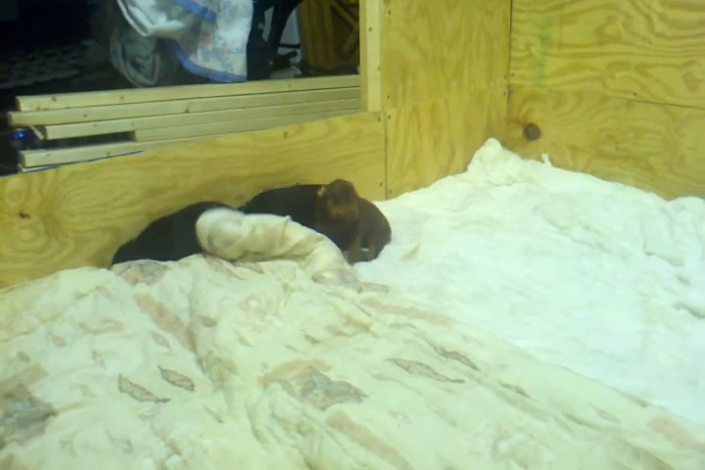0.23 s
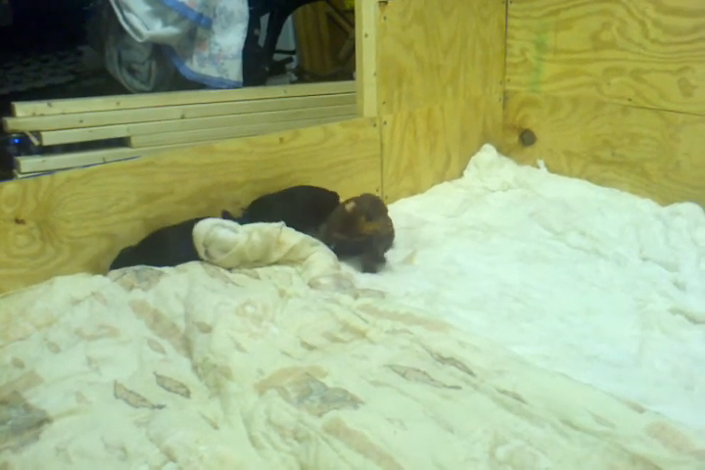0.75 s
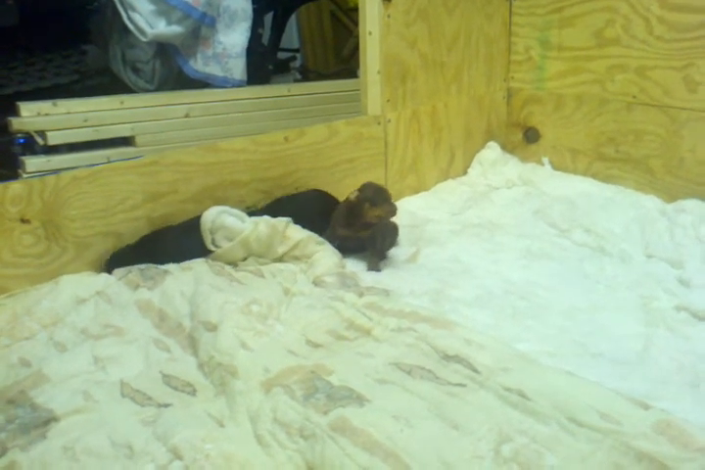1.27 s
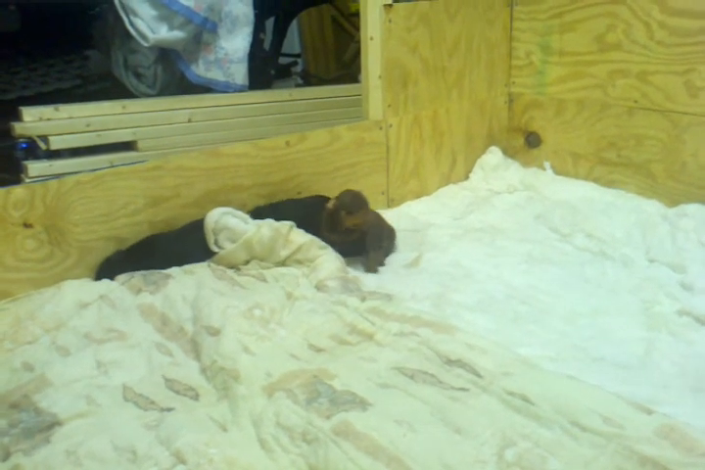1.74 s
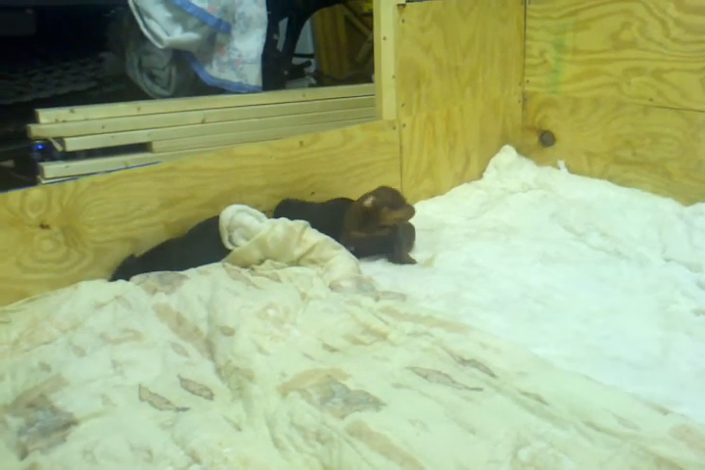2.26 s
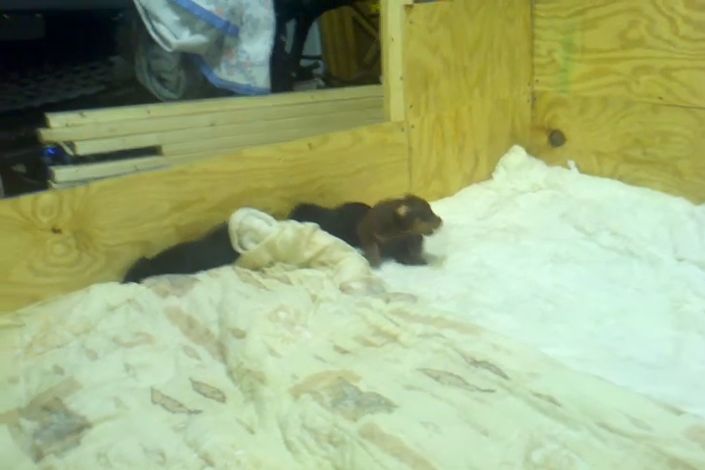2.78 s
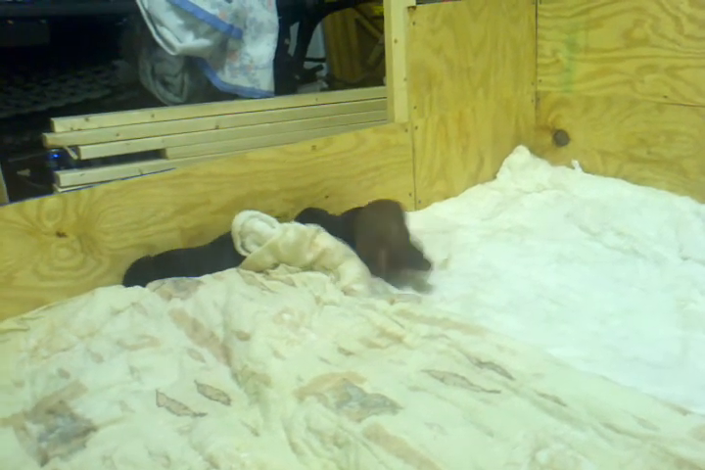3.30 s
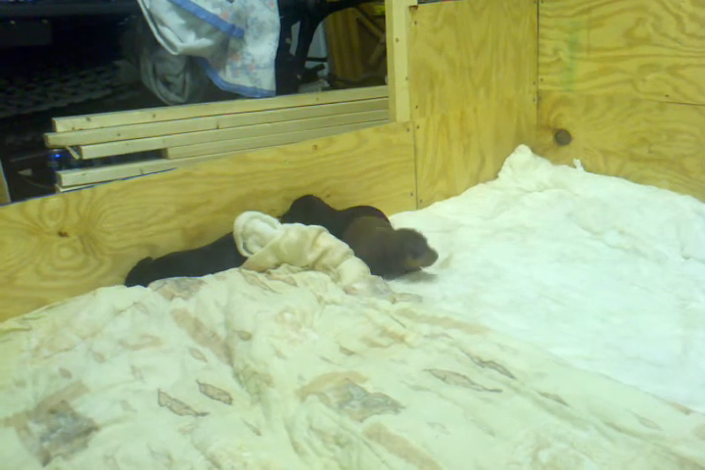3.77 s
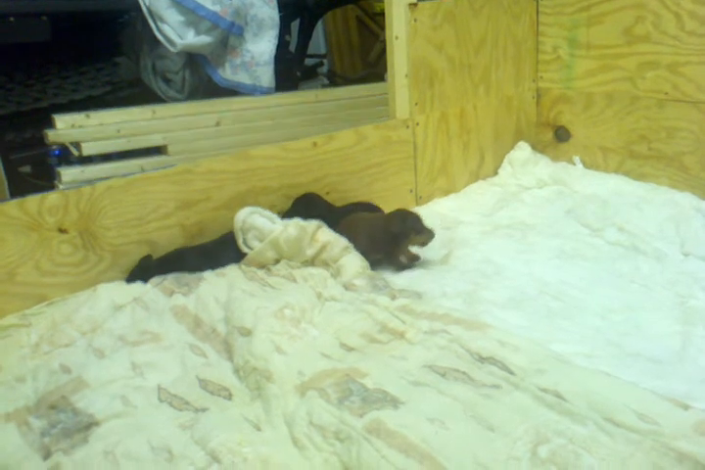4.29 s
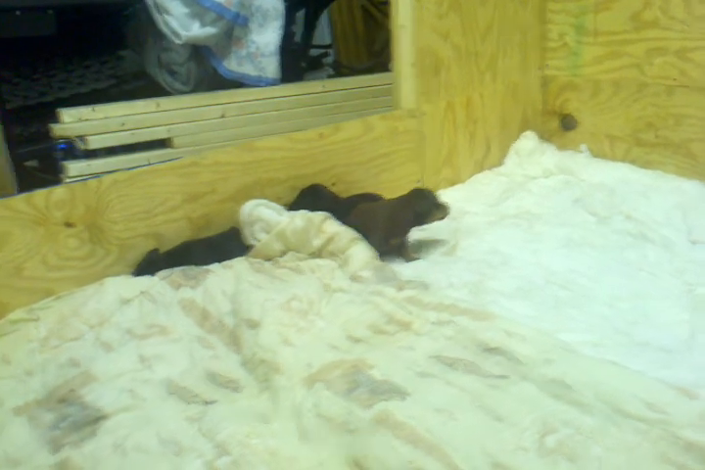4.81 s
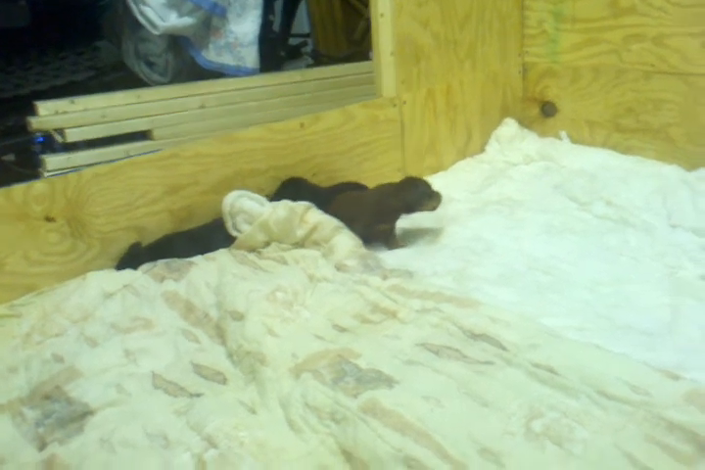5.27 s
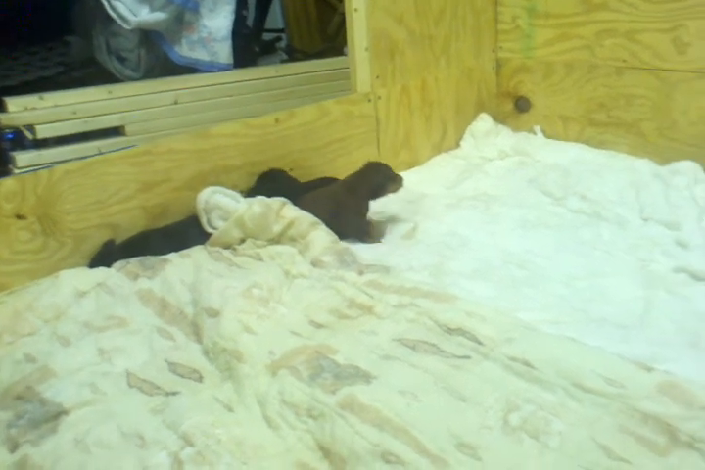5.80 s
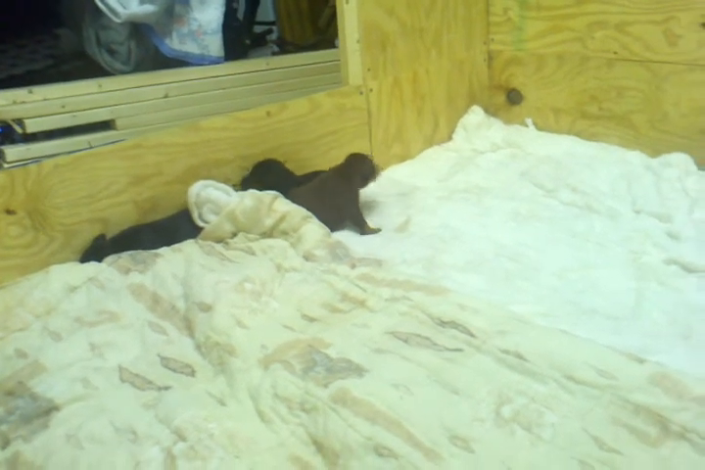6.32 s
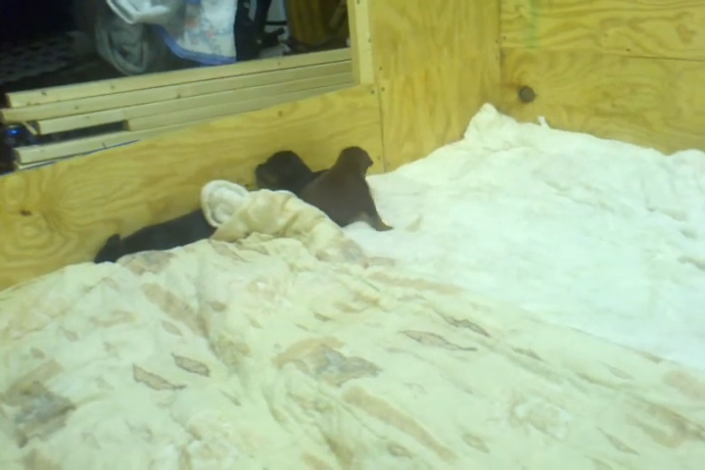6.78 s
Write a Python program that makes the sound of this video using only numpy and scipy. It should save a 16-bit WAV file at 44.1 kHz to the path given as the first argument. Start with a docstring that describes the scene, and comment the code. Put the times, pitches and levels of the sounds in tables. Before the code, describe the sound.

In a small blanket-lined wooden pen, tiny puppies give brief falling whines and broken squeaks while their bodies shuffle on fabric and thud dully against the floor. The cries start weakly, grow piercing near two seconds, then turn lower and rougher. A single loud click snaps at the right beside the microphone past four seconds, then quiet peeps and sniffing continue over low room hum, with short, dull wall reflections.

```python
"""Whimpers and squeaks of newborn puppies are heard, with snuffling and shuffling on cloth and soft bumps on the floor.
One hard snap sounds close to the right of the microphone, above faint hum and room tone. The voices are near-sines with
throat-coloured upper partials, the noises are shaped by frequency and time, and the bumps and snap are struck modes.
The blanket-lined plywood pen answers through feedback delays; two microphone ports are widened by cross-feed."""
import sys
import numpy as np
from scipy import signal
from scipy.fft import rfft, irfft, next_fast_len
from scipy.io import wavfile
from scipy.ndimage import uniform_filter1d

SR = 44100
rng = np.random.default_rng(int(sys.argv[2]) if len(sys.argv) > 2 else 0)


def inscribe(sig):
    """Save sig as 16-bit PCM at rate SR to the path in sys.argv[1].

    A 1-D sig is mono; a 2-D sig holds one channel per row.
    Samples are clipped to [-1, 1] before scaling.
    """
    pcm = np.round(np.clip(np.atleast_2d(sig).T, -1, 1) * 32767)
    wavfile.write(sys.argv[1], SR, pcm.astype(np.int16))


N = 310905
T = np.arange(N) / SR


def from_db(db):
    """Logarithmic level: 20 dB is a factor of ten in amplitude."""
    return 10 ** (np.asarray(db) / 20)


def rms_one(x):
    """Normalisation: a signal is scaled to unit rms."""
    return x / np.sqrt(np.mean(x ** 2) + 1e-20)


def at_hz(points, hz):
    """Spectral envelope: values are joined by straight lines on a log-frequency axis."""
    known_hz, values = np.array(points).T
    return np.interp(np.log(hz), np.log(known_hz), values)


def glide(share, values):
    """Piecewise-linear course: values spread evenly over a call are joined by straight lines."""
    return np.interp(share, np.linspace(0, 1, len(values)), values)


def drift(rate, size=N):
    """Low-passed noise: a two-pole filter with its corner near rate (Hz) gives slow chance with unit rms."""
    r = np.exp(-2 * np.pi * rate / SR)
    settling = 4000
    noise = rng.standard_normal(size + settling)
    return rms_one(signal.lfilter([1], [1, -2 * r, r * r], noise)[settling:])


def butter(order, hz, kind, x):
    """Butterworth filtering: a maximally flat passband."""
    return signal.sosfilt(signal.butter(order, hz, kind, fs=SR, output="sos"), x)


def ring(clicks, hz, t60):
    """Damped resonance: a unit click excites a decaying sine of nominal height 1."""
    r, w = from_db(-60 / (t60 * SR)), 2 * np.pi * hz / SR
    return signal.lfilter([0, np.sin(w)], [1, -2 * r * np.cos(w), r * r], clicks + 1e-18)


# Likeness of diffuse sound at the two ports. Each row: frequency in Hz, correlation coefficient.
PORT_LIKENESS = [(25, 0.62), (60, 0.55), (120, 0.85), (260, 0.36), (700, 0.4), (1800, 0), (13000, 0.18)]


def diffuse(spectrum, white):
    """Diffuse-field coherence: two coloured noises are mixed to the likeness of the ports."""
    hz = np.maximum(np.fft.rfftfreq(N, 1 / SR), 5)
    alike = np.clip(at_hz(PORT_LIKENESS, hz), -1, 1)
    mid, side = rfft(white) * from_db(at_hz(spectrum, hz)) * np.sqrt(SR / 4)
    return irfft(np.sqrt(1 + alike) * mid + np.sqrt(1 - alike) * side * [[1], [-1]], N)


# Spectrum of the room's background noise before the cross-feed. Each row: frequency in Hz, level in dB per Hz.
ROOM_SPECTRUM = [(20, -84.5), (45, -89.5), (80, -91), (120, -81), (180, -90), (260, -90.5), (400, -94),
                 (700, -101), (1100, -104), (1800, -110.5), (2400, -112), (4400, -117), (7000, -115.5),
                 (13000, -114)]


def room_tone():
    """Stationary coloured noise: a broad background whose level wavers with a spread of 1 dB."""
    white = rng.standard_normal((2, N)) * from_db(1.0 * drift(9.8))
    return diffuse(ROOM_SPECTRUM, white)


# Mains hum before the balance of the ports. Each row: frequency in Hz, nominal rms level in dB.
HUM_TONES = [(60, -81.5), (120, -70), (242, -77)]


def mains_hum():
    """Line spectrum: steady mains sines whose levels wander with a spread of 1 dB."""
    return sum(np.sqrt(2) * from_db(db + 1.0 * drift(4)) * np.sin(2 * np.pi * hz * T) for hz, db in HUM_TONES)


def swell(s, rise_s, fall_s, peak_db):
    """Exponential growth and decay: noise power climbs and sinks straight in dB, 20 dB in each given time."""
    return from_db(2 * (peak_db - 20 * np.maximum((s - T) / rise_s, (T - s) / fall_s)))


# Spectral shapes of the dull body, the middle rasp and the bright hiss; each sum is scaled to unit rms.
# Each row: frequency in Hz, relative level in dB per Hz.
BODY_SPECTRUM = [(150, 18.5), (400, 28), (800, 28), (1300, 24), (2000, -33), (3500, -37)]
RASP_SPECTRUM = [(600, 2), (1200, 1), (1900, 4), (2600, 0.5), (3600, -1), (6000, -26)]
HISS_SPECTRUM = [(1500, -19), (2800, -19), (3800, -8), (5200, -5), (7200, -3.5), (9500, -7.5), (13000, -16)]
# Bodies shuffling on the cloth. Each row: loudest moment in seconds, rise and fall over 20 dB in seconds,
# peak level of the dull body in dB, peak level of the bright hiss in dB.
CLOTH_SHUFFLES = [(0.51, 0.021, 0.27, -72, -67.5), (0.672, 0.02, 0.19, -54.5, -61),
                  (1.084, 0.029, 0.084, -72, -64.5), (1.172, 0.029, 0.13, -70, -70),
                  (1.622, 0.033, 0.13, -47, -54.5), (2.368, 0.018, 0.11, -57, -68),
                  (2.698, 0.12, 0.21, -59, -64), (3.439, 0.0086, 0.18, -58, -93),
                  (3.96, 0.21, 0.11, -66.5, -58.5), (4.171, 0.25, 0.39, -82.5, -63),
                  (4.32, 0.16, 0.1, -69, -78.5), (4.42, 0.14, 0.28, -77.5, -68.5),
                  (6.452, 0.0077, 0.093, -56.5, -94), (6.49, 0.034, 0.049, -58.5, -82)]
# Puffs of breath through the nose. Each row: loudest moment in seconds, peak hiss level in dB.
NOSE_PUFFS = [(0.87, -70), (2.33, -68), (3.09, -62.5), (3.39, -66), (3.69, -68.5), (5.05, -62),
              (5.42, -62.5), (5.921, -64.5), (6.27, -74), (6.38, -66.5), (6.82, -68)]
PUFF_RISE_S, PUFF_FALL_S = 0.16, 0.12   # over 20 dB
STIR_BODY_DB, STIR_HISS_DB = -90, -76.5   # the litter never lies quite still


def shuffle(grain_db=1.5, rasp_db=6):
    """Friction and turbulence noise in uneven grains; the middle rasp follows both the dull and the bright part."""
    body_power = sum(swell(s, rise, fall, db) for s, rise, fall, db, _ in CLOTH_SHUFFLES)
    hiss_power = sum(swell(s, rise, fall, db) for s, rise, fall, _, db in CLOTH_SHUFFLES)
    hiss_power = hiss_power + sum(swell(s, PUFF_RISE_S, PUFF_FALL_S, db) for s, db in NOSE_PUFFS)
    body = np.sqrt(from_db(2 * STIR_BODY_DB) + body_power)
    hiss = np.sqrt(from_db(2 * STIR_HISS_DB) + hiss_power)
    rasp_power = body * np.sqrt(hiss_power) + from_db(STIR_BODY_DB + STIR_HISS_DB)
    rasp = np.sqrt(rasp_power) * from_db(rasp_db)
    out = 0
    for spectrum, gain in ((BODY_SPECTRUM, body), (RASP_SPECTRUM, rasp), (HISS_SPECTRUM, hiss)):
        grains = rng.standard_normal((2, N)) * from_db(grain_db * drift(160))
        out = out + gain * rms_one(diffuse(spectrum, grains))
    return out


# Whimper calls before left-right balance. Each row: octave level and upper-partial level in dB against the
# fundamental (each one value, or several at even steps), brightening in dB (minus this at the start, plus this at
# the end), and a course of points: time in seconds, pitch in Hz, nominal rms level of the fundamental in dB.
WHIMPER_CALLS = [ (-33, -27, -8, [(0.431, 1120, -76), (0.461, 1172, -64), (0.499, 1240, -90)]),
                 (-11, -16.5, -2, [(0.81, 990, -71), (0.83, 970, -58), (0.842, 903, -56), (0.865, 849, -49),
                 (0.882, 868, -60), (0.895, 855, -56.5), (0.912, 785, -56.5)]), ([-16, -14, 11, -3, -6, -3],
                 -24, 0, [(0.919, 690, -53), (0.926, 655, -51), (0.94, 587, -41), (0.948, 583, -48),
                 (0.957, 594, -77), (0.97, 615, -76), (1.03, 600, -76)]), (-11, -26, 0, [(1.163, 1120, -71),
                 (1.172, 1085, -68), (1.19, 980, -72)]), (-13, -20.5, -7, [(1.212, 963, -57.5),
                 (1.231, 900, -52.5), (1.242, 906, -49), (1.249, 890, -53), (1.258, 832, -53.5),
                 (1.269, 900, -57.5), (1.297, 870, -66)]), (-9.5, [-15.5, -10.5, -17],
                 -2.2, [(1.531, 1036, -56.5), (1.55, 1000, -59), (1.596, 950, -51), (1.612, 987, -56)]),
                 ([-24, -26, -36, -36, -19, -6, -29, -32, -28], [-26.5, -16.5, -19.5, -3.5, -34],
                 0, [(1.833, 1170, -47.5), (1.858, 1367, -53), (1.87, 1250, -45.5), (1.892, 1188, -43.5),
                 (1.96, 1165, -47.5), (1.97, 1114, -46), (2.003, 1097, -54), (2.016, 1060, -81),
                 (2.06, 1090, -70), (2.11, 1105, -76)]), ([-29, -22, -17, -19, -10, -17, -20, -19],
                 [-32, -7.5, -11, -8], 0, [(2.226, 1380, -55), (2.236, 1391, -54.5), (2.265, 1424, -48.5),
                 (2.297, 1282, -46.5), (2.307, 1231, -51), (2.32, 1134, -52.5), (2.337, 1050, -52.5),
                 (2.349, 1008, -54.5), (2.369, 974, -51), (2.39, 945, -50.5), (2.405, 847, -73),
                 (2.465, 966, -86)]), (-15, -19, 0, [(2.58, 546, -72), (2.64, 530, -67), (2.7, 520, -69)]),
                 ([-14, -16, -5.5, -22, -6, -7, -5, 11], [-30, -7.5, -7.5, -11], 0, [(2.62, 959, -53),
                 (2.636, 942, -63), (2.654, 994, -50.5), (2.67, 1034, -58.5), (2.688, 1036, -55),
                 (2.71, 997, -54.5), (2.742, 981, -52.5), (2.758, 992, -58), (2.766, 980, -83)]),
                 (-28, -28, 0, [(2.68, 1580, -61), (2.7, 1460, -61), (2.725, 1430, -63),
                 (2.78, 1350, -82)]), ([-6, -13, -15, 1, 4, 7, -7, 5, -8, -15], [-15, -6, -6, -12],
                 0, [(2.991, 1100, -57), (3.004, 1115, -60), (3.028, 1137, -55), (3.038, 1054, -65),
                 (3.054, 1019, -62.5), (3.08, 1044, -71), (3.1, 943, -67.5), (3.116, 885, -62),
                 (3.13, 892, -75), (3.16, 909, -64)]), ([-11, -12, -14, -12, -20, -23, -11, -10],
                 -26, -1.2, [(3.359, 750, -58), (3.368, 729, -43.5), (3.38, 704, -55.5),
                 (3.402, 693, -48.5), (3.42, 691, -55), (3.439, 680, -58), (3.465, 709, -63.5),
                 (3.5, 713, -58.5)]), (-16, -20.5, -2.5, [(3.635, 666, -65.5), (3.668, 696, -55),
                 (3.682, 562, -40.5), (3.694, 535, -64), (3.705, 654, -57), (3.73, 660, -64),
                 (3.78, 676, -71)]), ([-3, -26, -20.5, -19, -8], -18, 0, [(4.224, 944, -65),
                 (4.236, 901, -57.5), (4.248, 842, -43.5), (4.276, 856, -44.5), (4.295, 862, -59),
                 (4.325, 825, -70.5)]), (-18, -34, 0, [(4.336, 810, -62), (4.346, 781, -54.5),
                 (4.38, 748, -65), (4.42, 697, -66.5)]), (-21.5, -11, 4.4, [(4.66, 853, -53.5),
                 (4.675, 808, -68), (4.695, 770, -67)]), (-13.5, [-13, -10.5, -26],
                 -0.21, [(4.902, 1106, -51.5), (4.912, 1012, -58), (4.974, 952, -53), (4.988, 956, -67),
                 (5.004, 895, -52.5), (5.022, 900, -57), (5.032, 925, -52.5), (5.042, 918, -70),
                 (5.06, 848, -53), (5.075, 862, -83)]), (-7, [-12, -3.5, -7.5, -2],
                 1.7, [(5.302, 1173, -55), (5.309, 1130, -52), (5.317, 1078, -61), (5.325, 1040, -58),
                 (5.336, 1044, -54.5), (5.36, 1040, -48.5), (5.371, 1044, -66), (5.384, 1030, -49.5),
                 (5.391, 1089, -64), (5.403, 1030, -52), (5.418, 993, -51.5), (5.435, 1045, -72),
                 (5.47, 966, -74)]), (-11.5, -35, -3, [(5.695, 820, -90), (5.711, 708, -53),
                 (5.725, 720, -79)]), (-4, -12, -1.5, [(5.922, 878, -71), (5.942, 905, -57.5),
                 (5.98, 869, -63)]), (-3.5, [-8, 1, -14, -16], 0, [(6.214, 976, -77), (6.236, 939, -58),
                 (6.252, 937, -74), (6.262, 973, -61.5), (6.285, 975, -71.5), (6.34, 934, -81)]),
                 (-21.5, -24, 1.7, [(6.568, 724, -60), (6.581, 716, -48), (6.6, 683, -62)]),
                 (-17.5, -25.5, -1.7, [(6.783, 638, -54), (6.802, 799, -47), (6.82, 837, -45.5),
                 (6.836, 724, -59), (6.86, 790, -75), (6.895, 803, -71)]), ]
# Roughness of the voice, one value from 0 to 1 for each call.
CALL_ROUGHNESS = [.3, .6, .6, .8, .7, .4, .8, .8, .5, .3, 1, .7, .9, .9, .4, .8, .6, .7, .6, .6, .5, .6, .4,
                  .6]
# Gain of the upper of the two throat resonances, one value in dB for each call.
CALL_HIGH_RING = [0, -9, 1, -5, -2, -3, 0.5, -5.5, -4, 0, 0, -5, 5, 2, -2, 3, 8, -2, 0.5, -0.5, -7, 2, 10,
                  2.5]
# Throat colouring of the upper partials. Each row: frequency in Hz, relative level in dB.
THROAT_SPECTRUM = [(2500, -18), (3700, -16), (4300, -2.5), (4900, -5), (5600, -5), (6300, -8.5),
                   (7000, -3.5), (7700, -8.5), (9500, -23), (13000, -38)]
RING_SPLIT_HZ = 6000   # partials above this belong to the upper resonance
UPPER_SMOOTH_S = .025   # averaging time of the level of partials 3 and up
ATTACK_S, RELEASE_DB_PER_S = 0.0058, 1395.5
OCTAVE_SWING = 1.4   # brightening of the octave against that of the upper partials
PATCHY_DB, PATCHES_PER_S = 3, 22   # spread in dB and filter corner in Hz of the partials' coming and going
# at full roughness: relative pitch spread, level spread, breath gain
JITTER, FLUTTER_DB, BREATH_DB = .009, 3.5, -7
HOLD_S = .02   # a rough voice holds its pitch this long, then slips
HOARSE = .4   # depth of the fast level noise at the end of a fully rough call
UPPER_HOARSE = .8   # depth at RING_SPLIT_HZ and full roughness on the upper partials, growing with frequency


def rough_phase(hz, rough):
    """Perturbed vocal-fold oscillation: a rough voice holds and slips in pitch, with added jitter."""
    size, hold = len(hz), int(HOLD_S * SR)
    held = hz[np.minimum(np.arange(size) // hold * hold + hold // 2, size - 1)]
    hz = hz + rough * (uniform_filter1d(held, hold // 4) - hz)
    phase = 2 * np.pi * np.cumsum(hz * (1 + rough * JITTER * drift(36.7, size=size))) / SR
    return hz, phase


def upper_voice(hz, phase, rough, ring_db):
    """Source and filter: the throat colours partials 3 to 13, and breath noise pulses with the vocal folds."""
    size, order = len(hz), np.arange(3, 14)[:, None]
    partial_hz = order * hz
    shares = from_db(at_hz(THROAT_SPECTRUM, partial_hz) + ring_db * (partial_hz > RING_SPLIT_HZ))
    patches = from_db([PATCHY_DB * drift(PATCHES_PER_S, size=size) for _ in order])
    fast_noise = np.array([drift(150, size=size) for _ in order])
    hoarse = 1 + rough ** 2 * UPPER_HOARSE * (partial_hz / RING_SPLIT_HZ) * fast_noise
    partials = shares * patches * hoarse * np.sin(order * phase + order ** 2)
    tone = partials.sum(axis=0) / np.sqrt((shares ** 2).sum(axis=0))
    breath = butter(2, [3200, 8500], "band", rng.standard_normal(size))
    return tone + rough * from_db(BREATH_DB) * breath * (1 + np.cos(phase))


def whimpers():
    """Self-sustained oscillation: vocal folds in near-sine swing, with overtones that come and go one by one."""
    out = np.zeros(N)
    for call, rough, ring_db in zip(WHIMPER_CALLS, CALL_ROUGHNESS, CALL_HIGH_RING):
        octave_db, above_db, brighten_db, course = call
        s, pitch_hz, level_db = np.transpose(course)
        start, length = s[0], s[-1] - s[0]
        # the slice lasts until the release has fallen by 40 dB
        part = slice(int(start * SR), int((start + length + 40 / RELEASE_DB_PER_S) * SR))
        t = T[part] - start
        share, size = t / length, len(t)
        release_db = RELEASE_DB_PER_S * np.maximum(t - length, 0)
        first_db = np.interp(t + start, s, level_db) - release_db
        bright_db = glide(share, [-brighten_db, brighten_db])
        # the partials above the octave swell and fade more smoothly than the fundamental
        smooth_db = uniform_filter1d(first_db, int(UPPER_SMOOTH_S * SR))
        hz, phase = rough_phase(np.interp(t + start, s, pitch_hz), rough)

        fundamental = from_db(first_db) * np.sin(phase)
        octave_level_db = first_db + glide(share, np.atleast_1d(octave_db)) + OCTAVE_SWING * bright_db
        octave_patches = np.sqrt(from_db(PATCHY_DB * drift(PATCHES_PER_S, size=size)))
        octave = from_db(octave_level_db) * octave_patches * np.sin(2 * phase + 1)
        upper_level_db = smooth_db + glide(share, np.atleast_1d(above_db)) + bright_db
        upper = from_db(upper_level_db) * upper_voice(hz, phase, rough, ring_db)

        attack = np.clip(t / ATTACK_S, 0, 1)
        flutter = from_db(rough * FLUTTER_DB * drift(60, size=size))
        # hoarseness grows as the call goes on
        flutter = flutter * (1 + rough ** 2 * HOARSE * glide(share, [0, 1]) * drift(250, size=size))
        out[part] += np.sqrt(2) * attack * flutter * (fundamental + octave + upper)
    return out


# Bodies on the floor board. Each row: time in seconds, nominal strength in dB, lower mode frequency in Hz.
BODY_BUMPS = [(0.816, -49, 128), (1.372, -49.5, 164), (1.698, -55, 103), (2.399, -50.5, 201.4),
              (2.847, -39.5, 133), (3.028, -46, 116), (3.478, -55, 145), (3.87, -47.5, 166)]
PUSH_S = .03   # the lumps of a push fall within this time


def bumps(t60=0.26, soft_hz=120, second=1.7, second_db=2):
    """Modal excitation: a short lumpy push rings two low modes of the padded board, softened by a band-pass."""
    out = np.zeros(N)
    for s, strength_db, hz in BODY_BUMPS:
        at = int(s * SR)
        push = np.zeros(SR // 4)
        lumps = (rng.random(5) ** 2 * PUSH_S * SR).astype(int)
        push[lumps - lumps.min()] = from_db(strength_db + 5) * rng.uniform(-.6, 1, 5)
        modes = ring(push, hz, t60) - from_db(second_db) * ring(push, second * hz, t60 / 2)
        out[at:at + len(push)] += butter(1, [soft_hz / 2, soft_hz], "band", modes)
    return out


# Thin whistles through a nose, before left-right balance. Each row: start in seconds, length in seconds,
# nominal rms level in dB, pitches in Hz at even steps from start to end.
NOSE_WHISTLES = [(2.59, 0.1, -80, [9450]), (4.1, 0.032, -65, [3640, 3660]), (4.11, 0.05, -68, [7350, 7320]),
                 (5.656, .59, -76.5, [8060, 9120, 9850, 9800, 9790, 9700, 9460, 9120, 8750, 8300, 8000, 7830])]


def whistles(jitter=0.001, fade_s=0.0034):
    """Frequency modulation: pure tones waver a little in pitch and level."""
    out = np.zeros(N)
    for start, length, level_db, pitch_hz in NOSE_WHISTLES:
        part = slice(int(start * SR), int((start + length) * SR))
        t = T[part] - start
        fade = np.clip(np.minimum(t, length - t) / fade_s, 0, 1)
        hz = glide(t / length, pitch_hz)
        phase = 2 * np.pi * np.cumsum(hz * (1 + jitter * drift(40, size=len(hz)))) / SR
        level = from_db(level_db + 1.6 * drift(28, size=len(hz)))
        out[part] += np.sqrt(2) * fade * level * np.sin(phase)
    return out


# Contacts within the snap. Each row: time in seconds, strength of the blow in dB.
SNAP_CONTACTS = [(4.3613, -26), (4.3618, -15.5), (4.3626, -14), (4.3633, -17.5), (4.3643, -26)]
# Modes of the struck body. Each row: frequency in Hz, level in dB against the blow, 60 dB decay time in seconds.
STRUCK_MODES = [(262, 0, 0.054), (485, 7.5, 0.062), (640, 9, 0.0073), (1056, -9, 0.021),
                (1150, -3.5, 0.0049), (1782, -0.5, 0.015), (2640, -17, 0.0063), (3430, 2, 0.0077),
                (4950, -3.5, 0.0024), (7800, -5.5, 0.0028)]
CRACK_DB, CRACK_S, CRACK_HZ = 4, .0004, 5800   # gain against the blow, decay constant, low-pass corner


def snap():
    """Impact excitation: a few quick contacts each give a crack of noise and a blow on the modes of a body."""
    blows, crack = np.zeros(N), np.zeros(N)
    after = T[:SR // 40]
    decay = np.exp(-after / CRACK_S) + 0.02 * np.exp(-after / 0.012)
    for s, blow_db in SNAP_CONTACTS:
        at = int(s * SR)
        blows[at] = from_db(blow_db)
        noise = rng.standard_normal(len(after))
        crack[at:at + len(after)] += from_db(blow_db + CRACK_DB) * noise * decay
    crack = butter(1, CRACK_HZ, "low", crack)
    body = sum((-1) ** k * from_db(db) * ring(blows, hz, t60)
               for k, (hz, db, t60) in enumerate(STRUCK_MODES))
    return butter(2, 160, "high", crack + body)   # too small to push deep bass


PEN_T60_S, PEN_DB, WALL_CUT_HZ = 0.22, -12.5, 11000   # bass decay time, send gain, low-pass corner per round


def pen(x):
    """Recirculating reflection: ten feedback delays a side between plywood walls, duller on every round."""
    size = next_fast_len(N + SR)
    w = 2 * np.pi * np.fft.rfftfreq(size)
    dull = 1 / (1 + 1j * w * SR / (2 * np.pi * WALL_CUT_HZ))
    lags = rng.uniform(.005, 0.024, (2, 10, 1)) * SR   # samples
    loop = from_db(-60 * lags / SR / PEN_T60_S) * dull * np.exp(-1j * w * lags)
    signs = (-1) ** np.arange(10)[:, None]
    response = (signs * loop / (1 - loop)).sum(axis=1)
    return irfft(rfft(x, size) * response, size)[:, :N]


def scene():
    """Superposition: puppies a little to the left, the snap close on the right, the rest on both sides."""
    background = room_tone() + mains_hum() * from_db([[.6], [-.6]])
    cloth = shuffle()
    puppies = whimpers() + whistles()
    close = snap()
    direct = puppies * from_db([[2.5], [-3.5]]) + close * from_db([[-14], [0]])
    direct = direct + bumps() * from_db([[.8], [-.8]])
    reflected = from_db(PEN_DB) * pen(puppies + from_db(-30.5) * close)
    return direct + reflected + cloth + background


CROSS_FEED, CROSS_LAG = 0.89, 15   # gain, delay in samples
CROSS_BLUR = .13   # smearing over neighbouring samples weakens the cross-feed in the treble
CUTOFF_HZ = 14150   # edge of the stopband


def record(dry):
    """Delay and subtract: each port enters the other channel inverted and late; deep bass and top are cut."""
    late = np.pad(dry, ((0, 0), (CROSS_LAG, 0)))[::-1, :N]
    late = late + CROSS_BLUR * np.diff(np.pad(late, ((0, 0), (1, 1))), 2)
    wide = butter(1, 70, "high", dry - CROSS_FEED * late)
    return signal.sosfiltfilt(signal.cheby2(20, 35, CUTOFF_HZ, fs=SR, output="sos"), wide)


dry = scene()
out = record(dry)
inscribe(out)
```